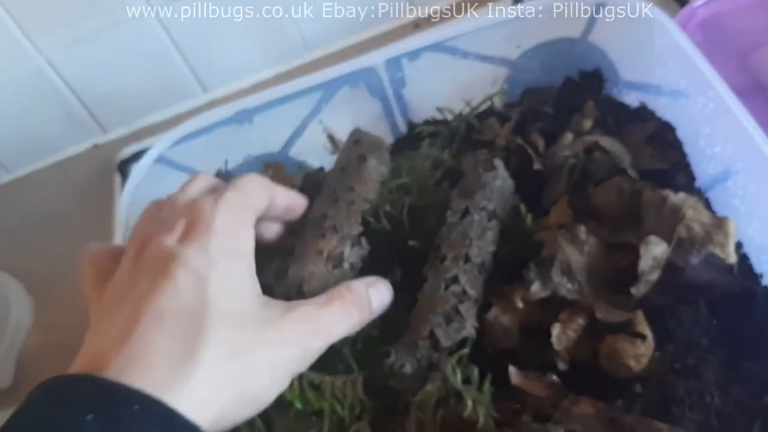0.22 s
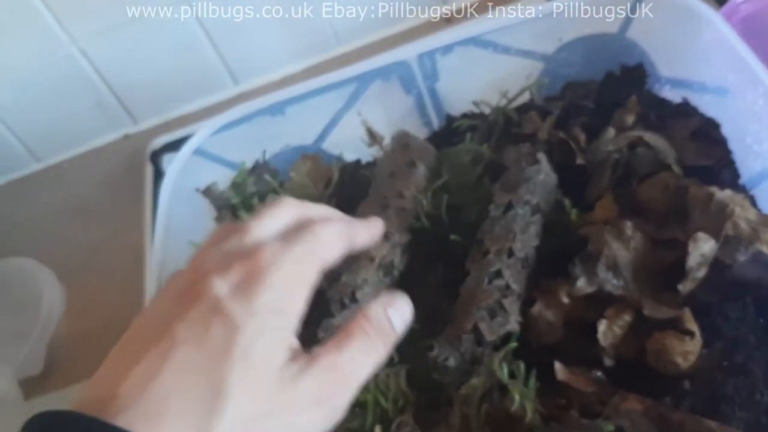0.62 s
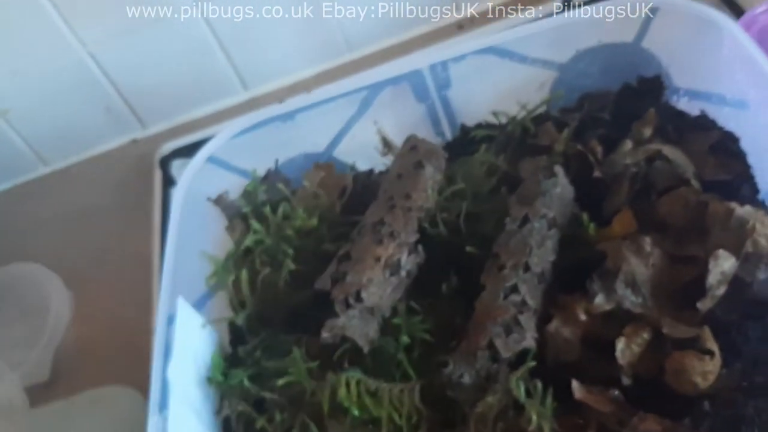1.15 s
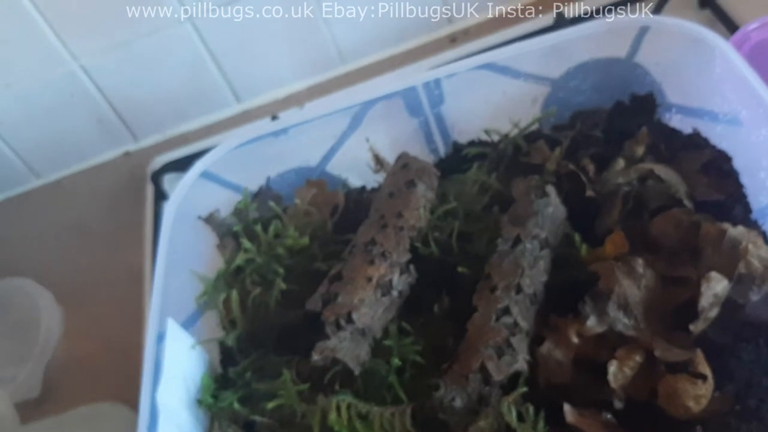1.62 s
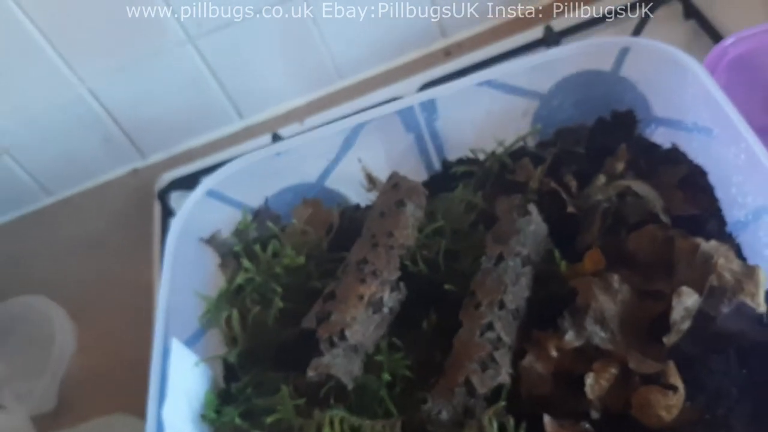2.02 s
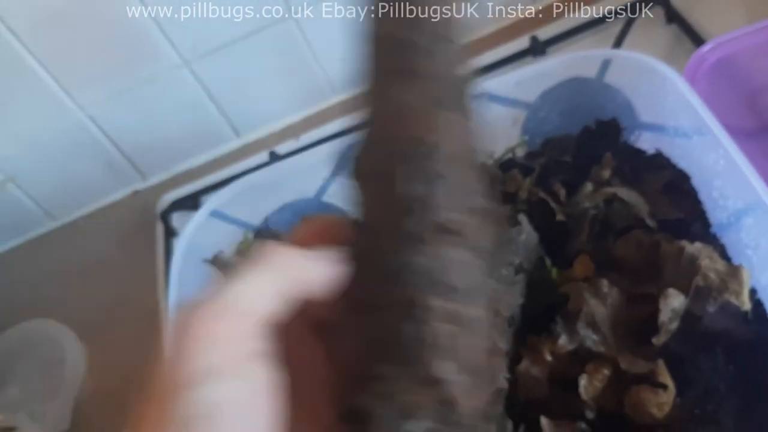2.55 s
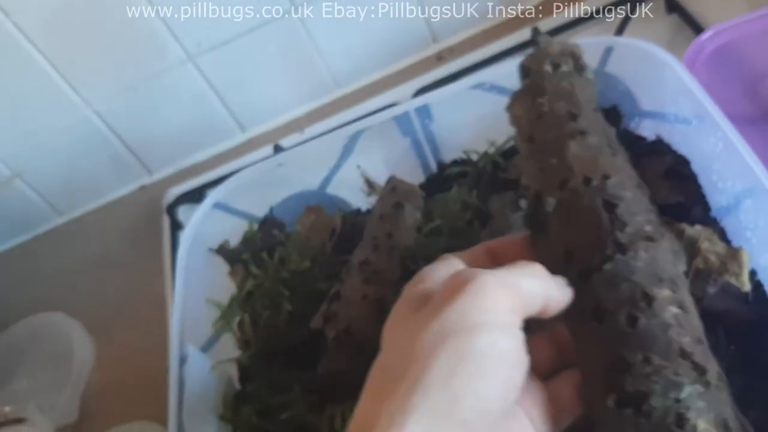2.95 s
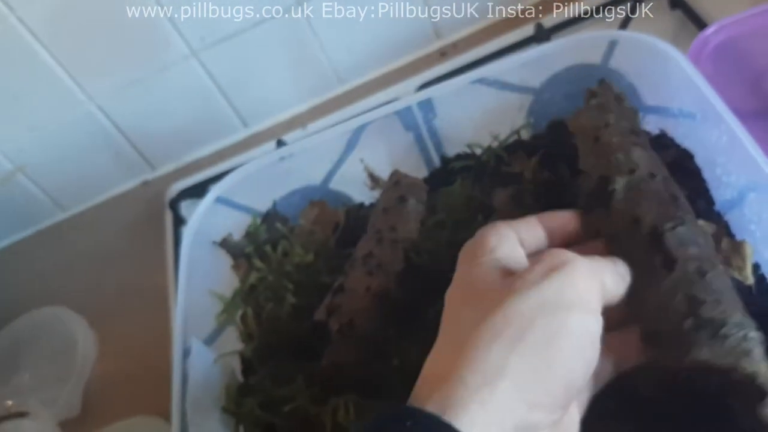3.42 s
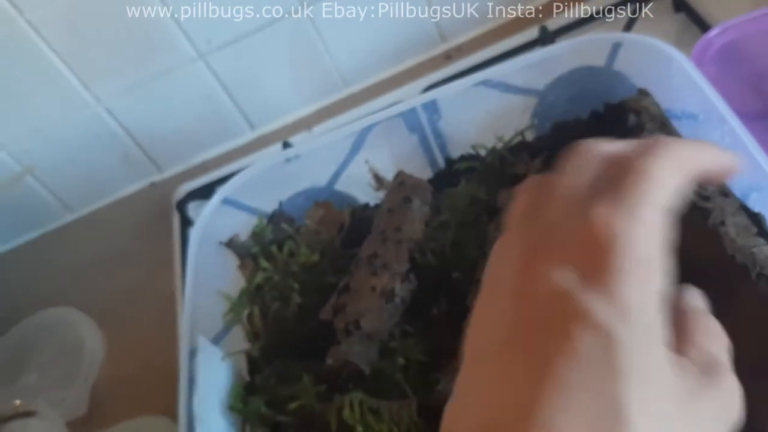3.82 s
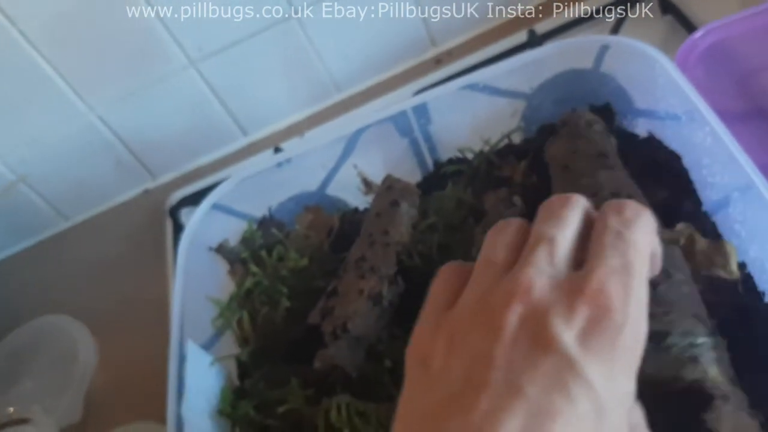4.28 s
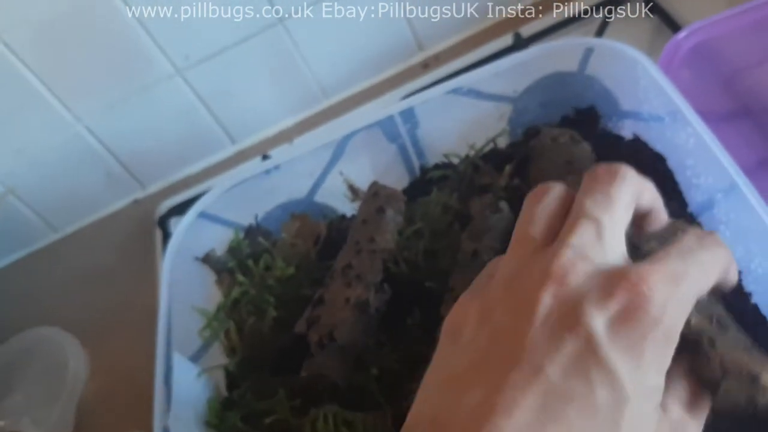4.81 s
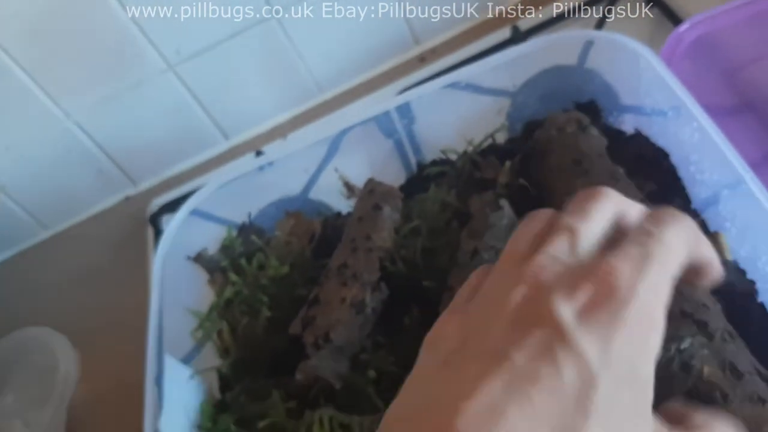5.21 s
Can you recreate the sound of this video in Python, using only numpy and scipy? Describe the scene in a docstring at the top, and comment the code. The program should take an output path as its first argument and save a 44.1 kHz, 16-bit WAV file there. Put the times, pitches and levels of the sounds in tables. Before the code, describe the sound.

A steady low mains hum, soft rumble and faint hiss fill a small tiled room, with a plastic tub just ahead of a stereo microphone. From 0.1 to 0.8 seconds dry leaves crackle in short crisp pushes with tiny stalk ticks. Around 0.9 to 1.0 a hand lightly brushes the tub wall, giving a dull plastic rub. At 1.58 a sharp, loud double clack of bark rings from a pile further to the side, followed by small rattles and light touches. After a quieter spell, fingers slide over bark around 2.3, with bright abrupt scrapes at 2.36 to 2.46. Near silence follows until crackling at 3.3; two main hollow woody knocks land at 3.54 and 3.61 amid snapping stalks. A faint wall brush and light crackle come at 4.0, then from 4.25 to the end the piece is worked in with grating, crunching and fizzing pushes, strongest around 4.7 to 5.05.

```python
"""Dry bark is bedded by hand into moss and leaf litter, which crackles, grates and fizzes under each push.
The plastic tub stands just ahead of a stereo microphone in a small tiled room; its wall is brushed by the hand.
A piece clacks and scrapes off a pile further off to the side, lands with two hollow knocks and is worked in.
Dry stalks tick. Shaped click noise makes the litter and scrapes, ringing modes make the knocks,
and a steady mains hum runs underneath with the rumble and hiss of the room."""
import sys
import numpy as np
from scipy import signal
from scipy.fft import rfft, irfft
from scipy.io import wavfile
from scipy.ndimage import uniform_filter1d

SR = 44100
rng = np.random.default_rng(int(sys.argv[2]) if len(sys.argv) > 2 else 0)


def waveform_to_disk(signal):
    """Save audio, clipped to [-1, 1], as 16-bit WAV at the path in sys.argv[1]."""
    frames = np.transpose(np.atleast_2d(signal))
    scaled = np.clip(frames, -1, 1) * 32767
    samples = np.round(scaled).astype(np.int16)
    wavfile.write(sys.argv[1], SR, samples)


N = 240433
TIME = np.arange(N) / SR


def amp(db):
    """Decibels to gain."""
    return 10 ** (np.asarray(db) / 20)


def unit(x):
    """Scales to an rms of one."""
    return x / np.sqrt(np.mean(x ** 2) + 1e-20)


def read(points, hz):
    """Reads a table over frequency, joined on a log-frequency axis."""
    f, value = np.transpose(points)
    return np.interp(np.log(hz + 1), np.log(f + 1), value)


def add(mix, s, sound):
    """Mixes a sound in at s seconds."""
    part = mix[max(round(s * SR), 0):][:len(sound)]
    part += sound[:len(part)]


def pan(left_db):
    """Gains of the two channels for a left-minus-right level."""
    return amp([[left_db / 2], [-left_db / 2]])


def wander(size):
    """Smooth random drift that changes over about size samples."""
    once = uniform_filter1d(rng.standard_normal(N), size=size)
    return unit(uniform_filter1d(once, size=size))


def swell(t, s, rise_s, fall_s):
    """The shape of every stroke: force grows up to the moment s, then relaxes."""
    return np.exp(-np.minimum(np.maximum((s - t) / rise_s, (t - s) / fall_s), 20))


def strokes(rows):
    """Power over time of each stroke in a table."""
    return np.array([(amp(db) * swell(TIME, s, rise_s, fall_s)) ** 2
                     for s, db, rise_s, fall_s, *_ in rows])


def colour(x, points, size=2048):
    """Causal minimum-phase filter of unit energy with the given spectrum."""
    log_gain = np.log(amp(read(points, abs(np.fft.fftfreq(size, 1 / SR)))))
    minimum_phase = np.exp(np.conj(signal.hilbert(log_gain)))
    taps = np.fft.ifft(minimum_phase).real[:size // 2]
    return signal.oaconvolve(x, taps / np.linalg.norm(taps))[:len(x)]


def resonate(x, hz, width_hz):
    """A resonance of gain one that follows the pitch curve hz: shift to zero, smooth, shift back."""
    turn = np.exp(2j * np.pi * np.cumsum(hz * np.ones(len(x))) / SR)
    r = np.exp(-np.pi * width_hz / SR)
    smooth = signal.lfilter([1 - r], [1, -r], x / turn + 1e-18)
    return 2 * (turn * smooth).real


def crackle(per_s, spread_db):
    """Tiny fractures: clicks of uneven size that swell in clumps, as fibres catch and give."""
    clumps_db = 3 * wander(size=130)
    uneven_db = spread_db * np.minimum(rng.exponential(1, N), 4)
    sizes = amp(uneven_db + clumps_db) * rng.choice([-1, 1], N)
    clicks = sizes * (rng.random(N) < per_s / SR)
    return clicks / np.sqrt(abs(uniform_filter1d(clicks ** 2, size=1400)) + 1e-3)  # evens the slow level


def contact(length_s, size=4096):
    """A rough touch: a short decaying run of tiny impacts with an even spectrum and unit energy."""
    z = rfft(rng.standard_normal(size) * np.exp(-TIME[:size] / length_s))
    power = uniform_filter1d(abs(z) ** 2, size=15)
    return irfft(z / np.sqrt(power + 1e-12)) * signal.windows.tukey(2 * size, .5)[size:]


def struck(blows, modes, crack_db, crack, grating):
    """Each blow rings the modes of a body, while crumbs at the contact crunch more broadly and grate on it."""
    force, crumbs, t = np.zeros(N), np.zeros(N), TIME[:SR // 2]
    for s, db, length_s in blows:
        add(force, s, amp([db]))
        add(crumbs, s, amp(db) * contact(length_s))
    ring = sum(amp(db - 60 * t / t60) * np.sin(2 * np.pi * hz * t) for hz, db, t60 in modes)
    drive = (1 - grating) * force + grating * crumbs
    sound = signal.oaconvolve(drive, ring / 3)[:N] + amp(crack_db) * colour(crumbs, crack)
    return signal.lfilter(*signal.butter(2, 115, "high", fs=SR), sound)  # little bass sounds below about 115 Hz


# likeness of the two microphone channels in diffuse sound: f/Hz, correlation
CHANNEL_LIKENESS = [(30, 0.31), (100, 0.37), (300, 0.57), (600, 0.35), (1300, 0.0028), (16000, 0)]


def diffuse(pair):
    """Makes two unrelated signals alike in the bass, as sound from all sides is at the microphone."""
    a, b = rfft(pair)
    c = np.clip(read(CHANNEL_LIKENESS, np.fft.rfftfreq(pair.shape[1], 1 / SR)), -1, 1)
    return irfft(np.array([a, c * a + np.sqrt(1 - c ** 2) * b]), pair.shape[1])


# decay of the tiled room: f/Hz, t60/s
ROOM_DECAY = [(150, 0.64), (500, 0.26), (2000, 0.21), (5000, 0.26), (14000, 0.11)]


def place(x, lead_ms, left_db, near_db, room_db, near_t60=0.044):
    """Direct sound at the microphone, quick echoes from the tub and tiles, and the tail of the room."""
    t = TIME[:SR // 2]
    direct = np.array([np.sinc(SR * t - 16 - side * lead_ms * SR / 2000) for side in (-1, 1)])
    near = diffuse(rng.standard_normal((2, len(t)))) * amp(-60 * t / near_t60) * (t > .001)
    hz, at, z = signal.stft(diffuse(rng.standard_normal((2, len(t)))), SR, nperseg=256)
    decaying = z * amp(-60 * at / read(ROOM_DECAY, hz)[:, None])
    tail = signal.istft(decaying, SR, nperseg=256)[1][:, :len(t)]
    tail = tail * np.minimum(t / 0.013, 1) ** 2  # the tail builds up before it decays
    response = direct + amp(near_db) * near / np.linalg.norm(near[0])
    response = response + amp(room_db) * tail / np.linalg.norm(tail[0])
    z = rfft(response)
    # echoes ripple the spectrum but keep its broad shape
    response = irfft(z / np.sqrt(uniform_filter1d(abs(z) ** 2, size=250)))
    response = response * np.clip(4 - 10 * t, 0, 1)
    # the first 16 samples only made space for the lead between channels
    return signal.fftconvolve(x[None], response * pan(left_db), axes=1)[:, 16:N + 16]


# mains hum before panning: f/Hz, level/dB rms
HUM_TONES = [(100, -51), (200, -71.5), (300, -99.5), (400, -106.5)]
# spectrum of the low room rumble: f/Hz, relative level/dB
RUMBLE_SPECTRUM = [(20, -15.5), (45, -8.5), (75, -2), (120, 0), (155, -1), (230, -11), (290, -2),
                   (380, -24.5), (700, -34)]
# spectrum of the room air: f/Hz, relative level/dB per Hz
AIR_SPECTRUM = [(190, -36), (330, -8.5), (486, -5.5), (553, -9), (609, -8), (896, -11.5), (1790, -13.5),
                (1940, -11.5), (2140, -13), (3000, -14), (6710, -14), (9720, -17), (15500, -10.5)]


def room_noise(spectrum):
    """Diffuse noise of the room, from all sides of the microphone, at an rms of one."""
    sides = [colour(side, spectrum, size=8192) for side in rng.standard_normal((2, N))]
    return unit(diffuse(np.array(sides)))


def background(rumble_db=-64.5, air_db=-63.5, hum_left_db=-1.55, air_left_db=-1.0, waver=0.022):
    """Steady mains hum, wavering slightly, over the low rumble and hiss of the room."""
    drift = unit(sum(np.sin(2 * np.pi * (f * TIME + rng.random())) / np.sqrt(f)
                     for f in np.geomspace(.3, 9, num=16)))
    tones = sum(amp(db) * np.sqrt(2) * np.cos(2 * np.pi * hz * TIME) for hz, db in HUM_TONES)
    low = (1 + waver * drift) * tones + amp(rumble_db) * room_noise(RUMBLE_SPECTRUM)
    return low * pan(hum_left_db) + amp(air_db) * room_noise(AIR_SPECTRUM) * pan(air_left_db)


# the hand brushes the tub wall: t/s, relative level/dB, contact decay/s
WALL_BRUSHES = [(.897, -43.5, 0.0017), (.938, -51, 0.004), (.957, -54, 0.018), (.979, -49, .01),
                (1.003, -56.5, 0.02), (4.02, -53.5, 0.0099)]
# modes of the plastic wall: f/Hz, relative level/dB, t60/s
WALL_MODES = [(244, -2, 0.13), (390, -16, 0.14), (491, 0, 0.12), (619, 1, 0.067), (975, 2.5, 0.057),
              (1960, -4, .05), (2110, 4, 0.054), (2830, -7, 0.095), (6400, 2, 0.0078)]
# crunch of the contact on the wall: f/Hz, relative level/dB
WALL_CRUNCH = [(40, -12), (250, 9.5), (900, 3), (1500, -10), (3500, -31), (6500, 3), (7300, -41)]


def wall_brushes():
    """The hand grates along the plastic wall and rings its modes."""
    return struck(WALL_BRUSHES, WALL_MODES, crack_db=21, crack=WALL_CRUNCH, grating=0.87)


# single leaves and twigs snap: t/s, relative level/dB, pitch f/Hz, relative crisp treble/dB
STALK_SNAPS = [(0.085, -50, 3400, -3), (.104, -47, 4500, -4), (0.319, -48, 4660, -6),
               (.355, -43.5, 4050, -1), (0.544, -46.5, 4360, 0), (0.564, -38, 7200, -1),
               (.578, -43, 5160, 3), (0.654, -42.5, 6840, 3), (1.794, -57.5, 5060, -12),
               (3.312, -43.5, 4900, 0), (3.323, -40, 5200, 0), (3.347, -43, 6100, -7),
               (3.423, -46, 6300, 2), (3.467, -48, 6250, 7), (3.5343, -36, 5070, -6), (3.548, -35, 4770, 8),
               (3.569, -36.5, 6500, 7), (3.606, -38, 4600, 2.5), (3.956, -48, 6200, 1),
               (3.9982, -42.5, 5200, 3), (4.256, -48, 5260, -2), (4.279, -45, 4500, -5),
               (4.703, -37.5, 4000, 3), (4.912, -41.5, 5400, -10), (4.997, -44, 3840, -2),
               (5.024, -36.5, 6000, 3), (5.098, -50.5, 4940, -3), (5.172, -49.5, 5030, -1),
               (5.191, -45, 4900, -10), (5.334, -41, 4240, 8)]


def snaps(snap_db=21, length_s=0.0003):
    """A dry stalk breaks with a brief tick around its own pitch."""
    out = np.zeros(N)
    for s, db, hz, crisp_db in STALK_SNAPS:
        ping = [(hz / 16, -26), (hz / 1.7, -20), (hz / 1.16, -9), (hz, 0),
                (min(hz * 1.13, 7350), -8), (7400, -11)]
        fizz = [(8600, crisp_db - 22.5), (13000, crisp_db - 16.0), (16000, crisp_db - 19)]
        add(out, s, amp(db + snap_db) * colour(contact(length_s), ping + fizz))
    return out


# the piece clacks against the pile: t/s, relative level/dB, contact decay/s
PILE_CLACKS = [(1.5758, -24.5, 0.0021), (1.5788, -21, 0.0025), (1.5865, -42, 0.0053),
               (1.604, -33.5, 0.0052), (1.613, -49, 0.004), (1.634, -48, 0.0029), (1.654, -40, 0.0046)]
# modes of the loose piece of bark: f/Hz, relative level/dB, t60/s
LOOSE_MODES = [(152, -11, 0.2), (234, -15, 0.08), (507, -24, 0.057), (672, -11, 0.16), (944, -8, 0.031),
               (1220, -3, 0.053), (2000, -0.5, 0.053), (2293, 0, 0.042), (3410, -5.5, 0.052),
               (3700, -8, 0.041), (3820, -14, .05), (4450, -8, 0.083), (4600, -16, 0.027),
               (5970, -12, 0.025), (6660, -13, .03)]
# dry crack of the contact on the pile: f/Hz, relative level/dB
PILE_CRUNCH = [(30, -4), (150, -4), (500, -0.5), (1200, 5), (2000, -0.5), (2900, -3.5), (4200, 0.5),
               (5500, -20), (7000, -15), (8200, -32), (15000, -38)]


def clacks():
    """The loose piece hits the pile and rings its modes under a strong dry crack."""
    return struck(PILE_CLACKS, LOOSE_MODES, crack_db=18.0, crack=PILE_CRUNCH, grating=0.19)


# the piece lands on the bedding: t/s, relative level/dB, contact decay/s
LANDING_KNOCKS = [(3.511, -44.5, 0.0042), (3.5355, -23, 0.0013), (3.5412, -31, 0.001),
                  (3.553, -33.5, 0.0031), (3.571, -31.5, 0.0033), (3.6072, -26, 0.0022),
                  (3.6128, -33.5, 0.0039)]
# modes of the bedded piece with the filled tub under it: f/Hz, relative level/dB, t60/s
BEDDED_MODES = [(152.6, -17, 0.39), (268, -10, 0.077), (409, -2, 0.079), (507, -18, 0.013), (733, 1, 0.036),
                (925, -8.5, 0.047), (1210, -6, 0.015), (1660, 4, 0.016), (1920, -11, 0.018),
                (2540, -11.5, 0.052)]
# dry crack of the contact on the bedding: f/Hz, relative level/dB
BED_CRUNCH = [(40, -15), (150, -2.5), (600, 4), (1700, -4), (3000, -11.5), (7000, -22), (12000, -38)]


def knocks():
    """The landing piece rings hollow, together with the filled tub under it."""
    return struck(LANDING_KNOCKS, BEDDED_MODES, crack_db=11.0, crack=BED_CRUNCH, grating=0.39)


# fingers slide over the bark: t/s at the peak, relative level/dB, rise/s, fall/s
FINGER_SLIDES = [(1.5, -57, 0.0096, .06), (2.27, -53.5, 0.039, 0.16), (2.4, -51, 0.082, 0.045),
                 (2.8, -65, .04, 0.044), (2.97, -64.5, 0.031, 0.047)]
# spectrum of the slides: f/Hz, relative level/dB
SLIDE_SPECTRUM = [(300, -22), (900, -14.5), (2000, 1.5), (3200, -2), (4900, 1), (5800, 1.5), (7000, 1),
                  (7900, -20), (12000, -9.5)]
# bark drags over bark, and light touches ring near 2.1 kHz, perhaps on the tub: t/s at the peak,
# level/dB before placing, rise/s, fall/s, pitch f/Hz, strength of that pitch/dB, relative crisp treble/dB
SCRAPES_AND_TOUCHES = [(.99, -59, 0.039, 0.05, 2070, 32, -12),
                       (1.575, -28, 0.0083, 0.0093, 3770, 11.5, -13), (1.62, -47, 0.036, 0.041, 780, 29, 4),
                       (1.714, -50, 0.0027, .014, 2040, 20, -21), (1.919, -59.5, 0.01, 0.045, 2040, 9, -30),
                       (2.226, -54, 0.0084, 0.0073, 2240, 26, 1),
                       (2.356, -35, 0.0037, 0.012, 4670, 13, -15),
                       (2.365, -33.5, 0.0073, 0.006, 1360, 13, 3), (2.403, -53, 0.0075, 0.0049, 5240, 3, 9),
                       (2.433, -43.5, .003, 0.01, 4900, 10, 1), (2.452, -39.5, 0.005, 0.0048, 2940, 15, 2),
                       (2.462, -38.5, 0.0042, 0.0022, 3160, 15, 4.5),
                       (3.275, -48, 0.0058, 0.021, 4930, 27, -6), (4.284, -55.5, 0.014, .01, 2200, 13, 0),
                       (4.51, -53.5, 0.015, 0.039, 5800, 26, 11), (4.69, -54, 0.089, 0.01, 4300, 24, -2),
                       (4.735, -46.5, 0.013, 0.0086, 2430, 17, 10), (4.919, -52, 0.002, 0.094, 2400, 22, 5),
                       (4.965, -46, 0.02, 0.019, 4000, 10, 7), (5.023, -38.5, 0.0034, 0.006, 890, 14.5, 8),
                       (5.185, -52, 0.0096, 0.0062, 2130, 22, -8)]
# spectrum of the scrapes and touches: f/Hz, relative level/dB
SCRAPE_SPECTRUM = [(200, -8), (500, -17.5), (750, -11), (1300, -4), (1800, 1.5), (2700, 0), (3600, -1.5),
                   (4600, 4.5), (5600, 3.5), (7100, 2), (8300, -15.5), (12000, -9), (15500, -21)]


def scrapes_and_touches(slide_db=-1, width_hz=450):
    """Bark drags over bark, and light touches ring near 2.1 kHz, perhaps on the tub: clicks rung at a pitch."""
    grains = crackle(per_s=6300, spread_db=1.5)
    slide_force = np.sqrt(strokes(FINGER_SLIDES).sum(axis=0))
    out = amp(slide_db) * colour(grains * slide_force, SLIDE_SPECTRUM)
    for s, db, rise_s, fall_s, hz, ring_db, crisp_db in SCRAPES_AND_TOUCHES:
        near = abs(TIME - s) < .15
        t, rough = TIME[near], grains[near]
        rung = rough + (amp(ring_db) - 1) * resonate(rough, hz, width_hz)
        spectrum = [(f, level + crisp_db * (f > 7800)) for f, level in SCRAPE_SPECTRUM]
        rung = colour(rung, spectrum)
        add(out, t[0], amp(db) * unit(rung) * swell(t, s, rise_s, fall_s))
    return out


# the hand pushes into the litter, which tightens and then settles: t/s at the peak, relative level/dB,
# rise/s, fall/s, central pitch of the crackle f/Hz, share of woody grating/dB, share of crisp fizz/dB
LITTER_PUSHES = [(0.091, -52, 0.01, 0.041, 5750, -4.5, -10), (.334, -56.5, 0.017, 0.052, 4770, -1.5, -7),
                 (.575, -49, 0.041, 0.052, 6600, -10, -6), (.622, -51, 0.024, 0.013, 5700, -13, -8),
                 (.76, -57, 0.086, .042, 5530, -10.5, -6), (3.326, -53, 0.038, 0.046, 5000, -4, -7.5),
                 (3.426, -58.5, .012, .09, 5900, -21, -7), (3.49, -57, 0.041, 0.034, 4800, -6.5, -7),
                 (4.001, -58, 0.014, 0.044, 5000, -22, 0), (4.045, -60.5, 0.035, 0.25, 5200, -7, -12),
                 (4.279, -54.5, 0.033, 0.032, 5200, -9.5, -12), (4.5, -59.5, 0.022, 0.19, 6200, -8.5, -4),
                 (4.711, -50.5, 0.083, 0.046, 4800, -9.5, -9), (4.816, -54.5, 0.036, 0.04, 4770, -10, -6),
                 (4.926, -50.5, 0.023, 0.064, 5300, -3, -7),
                 (5.022, -50.5, 0.0095, 0.018, 6000, -1.5, -4.5),
                 (5.188, -60, 0.025, 0.0081, 4670, -9, -20), (5.245, -54.5, 0.0092, 0.086, 5260, -11, -9),
                 (5.344, -52, 0.048, 0.083, 4930, -4.5, -7)]
# spectrum of the crackling leaves: f/Hz, relative level/dB
LEAF_SPECTRUM = [(1500, -21.5), (2600, -18), (3600, -4.5), (4800, 1), (5900, -3.5), (6900, -0.5),
                 (7500, -3.5), (8400, -23), (11000, -32)]
# spectrum of the woody grating: f/Hz, relative level/dB
GRATE_SPECTRUM = [(150, -27), (400, -5.5), (700, 0), (1050, 1.5), (1400, -1), (2150, 5.5), (2800, -3.5),
                  (4000, -9)]
# spectrum of the crisp fizz: f/Hz, relative level/dB
FIZZ_SPECTRUM = [(6500, -22.5), (8200, -6), (10000, 3.5), (12500, 9), (15500, -3)]


def litter(fizz_db=-1, focus=0.81, width_hz=800):
    """Pressed leaves crackle around the pitch of each push; bark grates on them and the driest edges fizz."""
    leaves = crackle(per_s=3400, spread_db=2.0)
    grit = crackle(per_s=1800, spread_db=4.5)
    power = strokes(LITTER_PUSHES)
    total = power.sum(axis=0)
    *_, pitch_hz, woody_db, crisp_db = np.transpose(LITTER_PUSHES)
    stray = np.exp(.13 * wander(size=400))
    hz = pitch_hz @ power / total / stray  # the strongest push weighs most; the pitch strays around it
    pitched = colour(leaves + focus * resonate(leaves, hz, width_hz), LEAF_SPECTRUM)
    body = unit(pitched) * np.sqrt(total)
    grate = colour(grit * np.sqrt(amp(woody_db) ** 2 @ power), GRATE_SPECTRUM)
    fizz = amp(fizz_db) * colour(leaves * np.sqrt(amp(crisp_db) ** 2 @ power), FIZZ_SPECTRUM)
    return body + grate + fizz


def scene():
    """The tub is just ahead of the microphone, the pile of bark further off to the side."""
    touches = scrapes_and_touches()
    return (background()
            + place(wall_brushes(), lead_ms=0.1, left_db=-0.5, near_db=-4, room_db=-3.5)
            + place(snaps(), lead_ms=-.05, left_db=-2, near_db=-1, room_db=-8, near_t60=.035)
            + place(clacks(), lead_ms=0.35, left_db=-1, near_db=2.5, room_db=0.5)
            + place(knocks(), lead_ms=-0.15, left_db=-2.0, near_db=-2.5, room_db=-10)
            + place(touches, lead_ms=0.27, left_db=-3.5, near_db=9, room_db=-4.5, near_t60=0.028)
            + place(litter(), lead_ms=0, left_db=-4.5, near_db=9.0, room_db=-6.5))


def record(dry, edge_hz=15850):
    """The band limit of the recorder: a steep low-pass at edge_hz."""
    low_pass = signal.firwin(801, edge_hz, window=("kaiser", 9), fs=SR)
    return signal.oaconvolve(dry, low_pass[None], "same")


dry = scene()
out = record(dry)
waveform_to_disk(out)
```